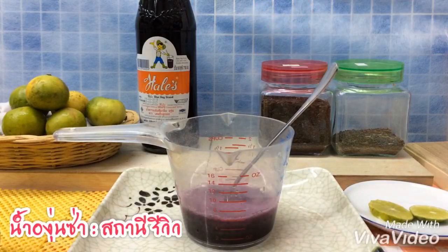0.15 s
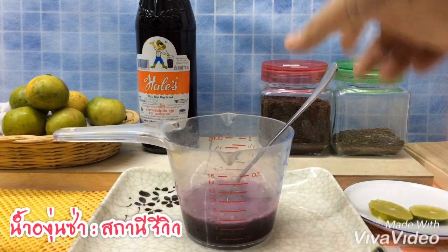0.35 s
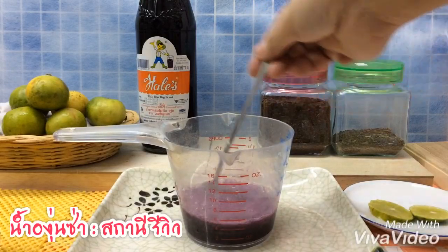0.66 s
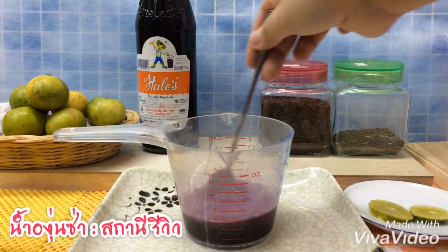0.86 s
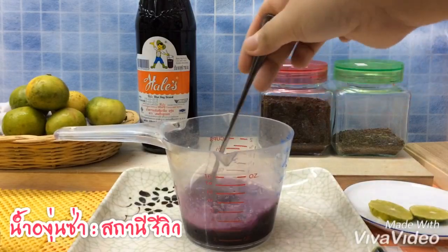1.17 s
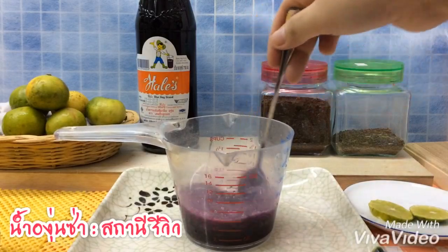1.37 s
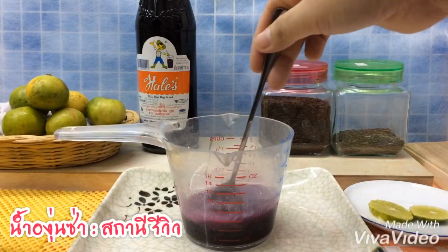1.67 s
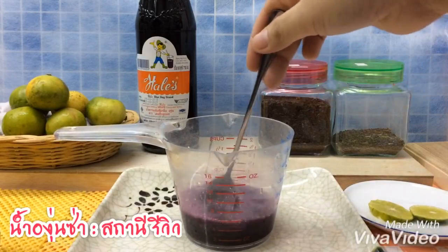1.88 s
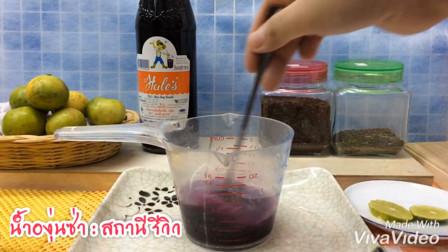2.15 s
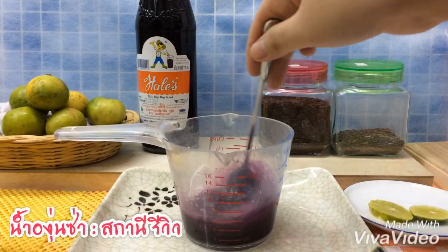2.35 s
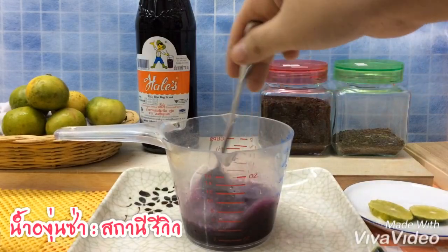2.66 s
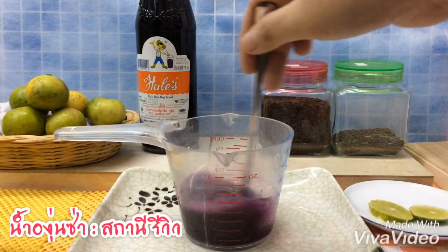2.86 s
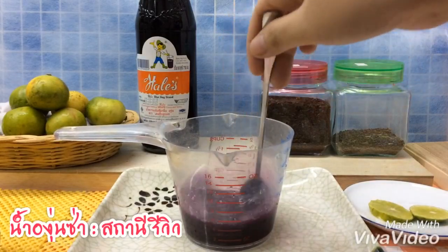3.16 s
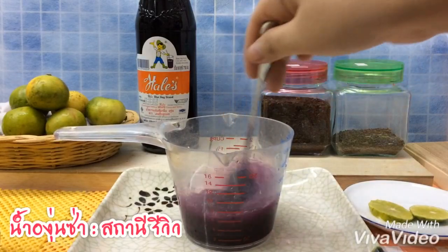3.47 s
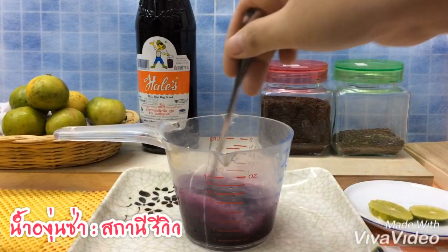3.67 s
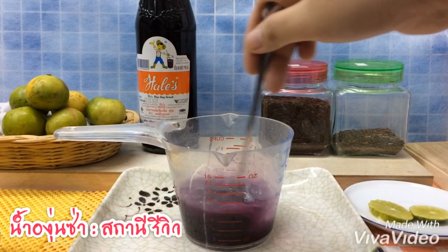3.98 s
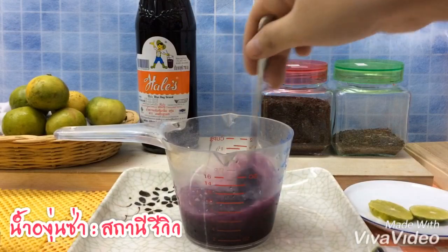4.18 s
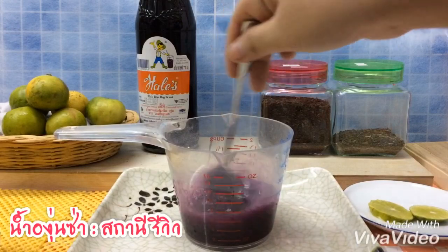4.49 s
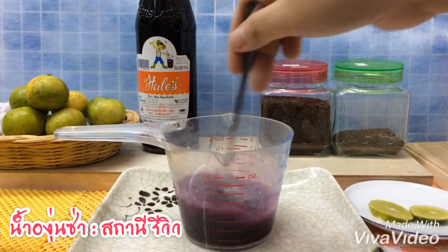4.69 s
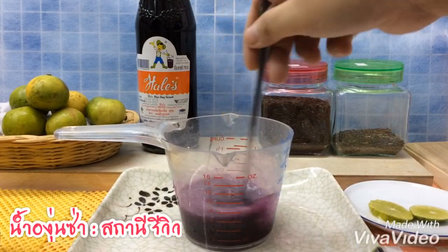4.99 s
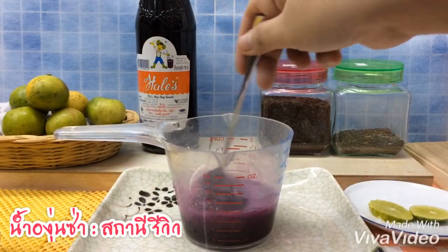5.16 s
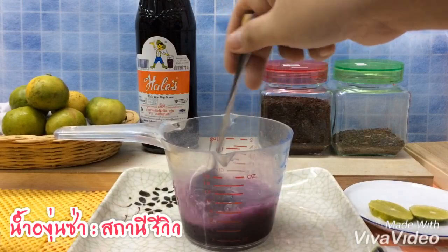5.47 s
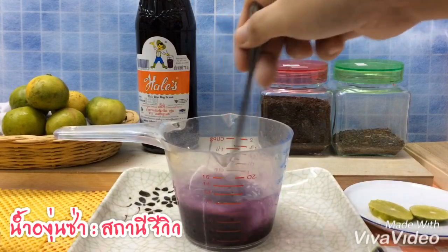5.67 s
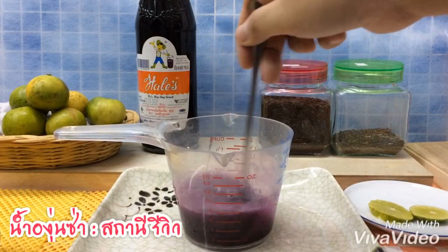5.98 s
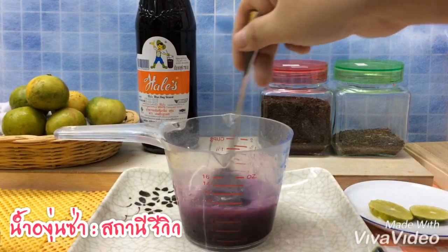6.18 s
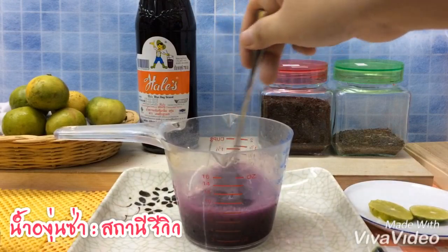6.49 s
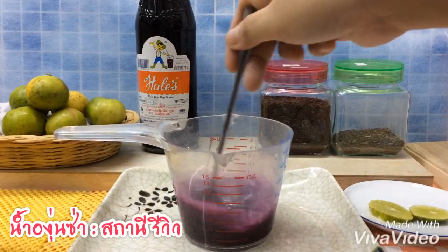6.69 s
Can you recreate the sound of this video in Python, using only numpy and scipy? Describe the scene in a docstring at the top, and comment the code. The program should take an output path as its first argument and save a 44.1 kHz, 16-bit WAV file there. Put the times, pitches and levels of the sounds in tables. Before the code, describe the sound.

For the first 0.7 seconds there is only soft hiss and deep, faint room rumble. From about 0.75 to 0.95 a long steel spoon is picked up, giving a tight cluster of bright, ringing clinks, the first lower, the next higher. A crisp hollow knock on the thin plastic jug comes at 1.1. Gentle stirring begins, with short scrapes, wet slosh and light fizz, and quieter moments near 1.8. Low gulps bubble at 1.5 and 2.55. From 2.2 the sweeps strengthen, several each second, with gurgles and uneven dull knocks, clearer at 3.7, 4.05, 4.8 and strongest at 5.4. Stirring continues steadily, with another firm knock at 6.77, until the end near 6.85. A very faint, wavering low drone swells after 6 seconds. The sound is close and fairly dry, with a short kitchen reflection.

```python
"""Spoon stirring a jug in a kitchen

Close microphone in a small kitchen: a long steel spoon is picked up, clinks, then stirs a syrupy drink
in a thin plastic jug on a tray. Clinks and knocks are decaying modes with a noise burst at the contact;
scrape, slosh and fizz are coloured random grains with bubbles, following each sweep of the bowl.
The room adds a short diffuse tail. Low rumble and soft hiss lie under it all; a faint drone comes late."""
import sys
import numpy as np
from scipy import signal
from scipy.fft import rfft, irfft, next_fast_len
from scipy.io import wavfile
from scipy.ndimage import uniform_filter1d, map_coordinates

SR = 44100
rng = np.random.default_rng(int(sys.argv[2]) if len(sys.argv) > 2 else 0)


def inscribe(sig):
    """Save sig as 16-bit PCM at rate SR to the path in sys.argv[1].

    A 1-D sig is mono; a 2-D sig holds one channel per row.
    Samples are clipped to [-1, 1] before scaling.
    """
    pcm = np.round(np.clip(np.atleast_2d(sig).T, -1, 1) * 32767)
    wavfile.write(sys.argv[1], SR, pcm.astype(np.int16))


N = 301644

# Levels in the tables are relative: each layer trims them further.
# Steady bed, hiss spectrum: f/Hz, level/dB
HISS_SPECTRUM = [(100, 3.5), (200, 5.5), (300, -2.5), (500, -3), (1100, -9.5), (2200, -12), (3700, -12),
                 (5500, -9), (7200, -6), (10000, -12.5), (16000, -18.5)]
# Steady bed, deep room rumble: f/Hz, level/dB
RUMBLE_SPECTRUM = [(8, -7), (18, -13), (27, 1), (36, -9.5), (50, -13), (60, -20), (85, -32), (125, -28.5),
                   (200, -35.5), (400, -58)]
# Decay of the kitchen's tail: f/Hz, t60/s
KITCHEN_DECAY = [(150, 0.19), (1000, 0.15), (3000, 0.18), (8000, 0.093), (16000, 0.074)]
# Bowl sweeping along the wall: t/s at its fastest, length/s, level/dB, froth over that level/dB
BOWL_SWEEPS = [(0.704, 0.12, -63.5, -9), (0.933, 0.35, -45, -22), (1.109, .2, -44.5, -3.5),
               (1.257, .13, -44.5, -2.5), (1.443, 0.059, -44, -6), (1.544, 0.13, -45.5, -8),
               (1.721, 0.047, -53, -16), (1.976, .2, -47.5, -6), (2.146, 0.13, -53.5, 0),
               (2.255, 0.086, -41.5, -10.5), (2.347, 0.094, -45, -4.5), (2.474, 0.095, -40.5, -10.5),
               (2.555, 0.12, -38, -17), (2.731, 0.072, -46, -6), (2.859, .1, -44.5, -6),
               (3.048, 0.17, -40.5, -10.5), (3.2, 0.032, -46.5, -11), (3.312, 0.14, -42, -13.5),
               (3.426, 0.15, -39.5, -9), (3.645, 0.25, -49, -3), (3.784, 0.11, -36.5, -8),
               (3.928, .06, -40, -17), (4.154, 0.12, -36.5, -7), (4.39, 0.15, -42.5, -21),
               (4.514, 0.095, -39.5, -10.5), (4.664, 0.069, -42, -20), (4.85, 0.11, -38, -12.5),
               (4.971, 0.054, -45, -12), (5.208, 0.14, -37.5, -11.5), (5.395, 0.077, -47.5, -5),
               (5.553, 0.15, -42.5, -19), (5.831, 0.12, -40, -16), (6.178, 0.16, -37.5, -17),
               (6.516, 0.18, -41, -16), (6.73, 0.079, -41.5, -5)]
# Strength of the drink's steady swirl: t/s, level/dB
SWIRL_LEVEL = [(1.35, -56), (1.88, -66.5), (2.08, -54.5), (3.32, -49.5), (3.75, -50), (4.38, -46.5),
               (5.08, -47.5), (5.34, -44.5), (5.92, -46.5), (6.84, -46.5)]
# Rubbed wall: f/Hz, level/dB
SCRAPE_SPECTRUM = [(200, -15.5), (600, -10.5), (870, 2.5), (980, 9.5), (1100, -10), (1290, -1.5),
                   (1460, 1.5), (1800, -23.5), (2500, -20.5), (4000, -29.5)]
# Churned liquid: f/Hz, level/dB
SLOSH_SPECTRUM = [(90, -24), (130, 8), (180, -24.5), (300, -6), (415, 4), (520, -4), (680, -10.5),
                  (1200, -36)]
# Bursting froth: f/Hz, level/dB
FIZZ_SPECTRUM = [(1000, -36), (2300, 0), (3500, 0.5), (5000, -1), (7000, 2), (10000, -9.5), (16000, -60)]
# Handle clinks at the pick-up: t/s, contact level/dB, low ring level/dB, high ring level/dB
HANDLE_CLINKS = [(0.7668, -18.5, -25.5, -45), (0.8193, -15, -43, -31), (0.8852, -21, -50, -28),
                 (0.9154, -24.5, -42, -58), (0.9288, -30, -44, -46), (0.9541, -26, -44, -54)]
# Bending modes of the steel spoon: f/Hz, level/dB, t60/s
SPOON_MODES = [(2110, -18, 0.44), (2270, -20, 0.3), (2882, 3.5, 0.21), (3720, -24, .3), (4300, -24, .35),
               (4697, -14, 0.3), (5380, -12, .25), (6300, -4.5, 0.18), (6287, -5, 0.17), (7192, -12, 0.18),
               (11670, -29, 0.29), (13610, -21, 0.21), (14180, -20, .18), (14900, -27, 0.23)]
# Rattling steel at the contact: f/Hz, level/dB
CHINK_SPECTRUM = [(250, -14), (420, -5), (650, -9), (1000, 1.5), (2200, 5), (4000, 2.5), (6000, 3),
                  (7800, -2.5), (10000, -17), (16000, -23)]
# Clear knocks on the jug: t/s, tick level/dB, main wall mode level/dB, upper wall modes level/dB
JUG_KNOCKS = [(1.002, -29, -30, -28.5), (1.0831, -8.5, -23, -15.5), (1.9642, -48, -35.5, -61),
              (1.9856, -44, -31.5, -51), (2.5295, -31, -25.5, -28.5), (2.5702, -35, -36.5, -32),
              (2.9452, -37.5, -37, -39), (3.0288, -24, -30.5, -27), (3.068, -43, -34, -52),
              (3.3578, -22.5, -34, -38), (3.3654, -28.5, -32, -27.5), (3.708, -18, -24, -17),
              (3.7976, -47, -31, -35), (3.9109, -50, -34, -52), (4.0566, -25.5, -23.5, -23),
              (4.2778, -27.5, -52, -27), (4.288, -26.5, -37.5, -44), (4.4925, -32, -34, -32),
              (4.5267, -33, -31.5, -49), (4.5641, -44, -31.5, -49), (4.616, -26, -28.5, -26.5),
              (4.7791, -19, -16.5, -17.5), (5.1073, -33, -26.5, -26.5), (5.1837, -34.5, -30.5, -35),
              (5.4219, -16, -12.5, -15), (5.719, -24.5, -26, -29), (5.9553, -26.5, -31, -32),
              (6.0424, -29, -26.5, -31), (6.2136, -47, -34, -56), (6.3713, -22.5, -30, -27),
              (6.769, -19.5, -19, -20)]
# Modes of the part-filled jug: f/Hz, level/dB, t60/s
JUG_MODES = [(126.7, -17, 0.26), (247, -44, 0.049), (409, -23.5, 0.13), (477.7, -12, 0.066),
             (876, -9, 0.025), (973, 4.5, 0.022), (1151, -7, 0.037), (1296, -1, 0.027), (1448, -8, 0.072),
             (1581, -7, 0.036), (1732, -12, 0.055), (1850, -21, 0.028), (2008, -14.5, .04),
             (2074, -17, 0.019), (2327, -16, 0.05), (2540, -15, 0.084), (2800, -50, 0.029),
             (3500, -28, 0.026), (3855, -17.5, 0.022), (5160, -24, .045)]
# Hard contact of bowl and wall: f/Hz, level/dB
TICK_SPECTRUM = [(100, -30), (300, -22), (500, -7), (900, 2.5), (2200, -1.5), (3300, -10.5), (5000, -11.5),
                 (7500, -11.5), (10000, -21.5), (16000, -31)]
# Air pockets gulping behind the bowl: t/s, level/dB, f/Hz
AIR_GULPS = [(1.523, -32.5, 290), (2.548, -29, 260), (2.581, -28, 268)]
# Faint far-off drone, its swell: t/s, level/dB
DRONE_LEVEL = [(5.7, -72.5), (6.3, -59.5), (6.65, -54.5), (6.84, -63)]
# Tones of the drone: f/Hz, level/dB
DRONE_PITCHES = [(160, 3), (194, -0.5)]

# a sweep: share of its length spent speeding up, dB below its peak at its start and end
RISE_SHARE, EDGE_DB = 0.47, 12.5
# soft bumps under the liquid: rate, level over the swirl, scatter either way
BUMPS_PER_S, BUMP_DB, BUMP_SPREAD_DB = 8, 6.5, 5
# the jug's low modes: level under a full-scale knock, dB per dB of the upper wall modes
BODY_DB, BODY_GROWS = -30.5, 0.4
TOP_HZ = 16000  # upper band limit


def amp(db):
    """Decibels to gain."""
    return 10 ** (np.asarray(db) / 20)


def unit(x):
    """Scale to rms 1."""
    return x / np.sqrt(np.mean(x ** 2) + 1e-20)


def along(points, hz):
    """Read (f/Hz, value) points on a log frequency axis."""
    f, v = np.transpose(points)
    return np.interp(np.log(hz + 1), np.log(f + 1), v)


def colour(x, spectrum):
    """Filter x by a spectrum, at rms 1."""
    m = next_fast_len(len(x) + 8192)
    gain = amp(along(spectrum, np.fft.rfftfreq(m, 1 / SR)))
    return unit(irfft(rfft(x, m) * gain, m)[:len(x)])


def noise(spectrum, size):
    """Coloured noise of rms 1."""
    return colour(rng.standard_normal(size), spectrum)


def add(track, s, sound):
    """Mix a sound into the track at time s."""
    i = max(0, round(s * SR))
    part = sound[:max(0, len(track) - i)]
    track[i:i + len(part)] += part


def in_kitchen(x, wet_db, gap=.004):
    """A sound plus, gap seconds later, a diffuse tail from the tiles and counter."""
    hz, t, z = signal.stft(rng.standard_normal(SR // 3), SR, nperseg=256)
    decay = amp(-60 * t / along(KITCHEN_DECAY, hz)[:, None])
    tail = signal.istft(z * decay, SR, nperseg=256)[1]
    tail = np.pad(tail / np.linalg.norm(tail), (int(gap * SR), 0))
    return x + amp(wet_db) * signal.fftconvolve(x, tail)[:len(x)]


def background(hiss_db=-56, rumble_db=-43):
    """Steady hiss over a deep room rumble, both coloured noise."""
    hiss = amp(hiss_db) * noise(HISS_SPECTRUM, size=N)
    rumble = amp(rumble_db) * noise(RUMBLE_SPECTRUM, size=N)
    return hiss + rumble


def effort():
    """Amplitude of the steady swirl, of the bowl's sweeps and of the froth that they raise."""
    t = np.arange(N) / SR
    steady = amp(np.interp(t, *np.transpose(SWIRL_LEVEL), left=-120))
    sweeps, froth = np.zeros(N), np.zeros(N)
    for s, length, db, froth_db in BOWL_SWEEPS:
        age = np.arange(-int(length * SR), int(2 * length * SR)) / SR
        away = np.maximum(-age / RISE_SHARE, age / (1 - RISE_SHARE)) / length
        swell = amp(db - EDGE_DB * away ** 1.72)
        add(sweeps, s - length, swell)
        add(froth, s - length, amp(froth_db) * swell)
    return steady, sweeps, froth


def grains(per_s, spread_db):
    """Random tiny impulses of uneven size, at rms 1."""
    scatter_db = spread_db * np.clip(rng.standard_normal(N), -2, 2)
    sizes = amp(scatter_db) * rng.choice([-1, 1], N)
    return unit(sizes * (rng.random(N) < per_s / SR))


def swirl(x, depth_db):
    """The moving hollow in the liquid lifts and damps narrow bands for moments."""
    z = signal.stft(x, nperseg=1024)[2]
    field = uniform_filter1d(rng.standard_normal(z.shape), size=3, axis=0)
    field = uniform_filter1d(field, size=4, axis=1)
    return unit(signal.istft(z * amp(depth_db * unit(field)), nperseg=1024)[1][:N])


def bubble(hz, cycles):
    """An air pocket swells over a few cycles and rings out, rising in pitch; cycles set its t60."""
    t = np.arange(SR // 10) / SR
    age = t * hz / cycles
    swell = 1 - np.exp(-t * hz / 2.2)
    return swell * amp(-60 * age) * np.sin(2 * np.pi * hz * t * (1 + 0.094 * np.minimum(age, 1)))


def bubbles(per_s, centre_hz, cycles, spread_db):
    """A random stream of bubbles, spread over an octave, at rms 1."""
    out = np.zeros(N)
    for when, size, strength in rng.random((int(per_s * N / SR), 3)):
        sound = bubble(centre_hz * 2 ** (size - .5), cycles)
        add(out, when * N / SR, amp(spread_db * strength) * sound)
    return unit(out)


def scraping(level, scrape_db=-3, gurgle_db=-10):
    """The bowl rubs along the wall in tiny slips, with mid-pitched bubbles behind it."""
    slips = swirl(colour(grains(per_s=530, spread_db=3), SCRAPE_SPECTRUM), depth_db=5.0)
    gurgles = bubbles(per_s=90, centre_hz=1194, cycles=42, spread_db=14)
    return level * (amp(scrape_db) * slips + amp(gurgle_db) * gurgles)


def sloshing(level, slosh_db=-10.0, glug_db=-16.5):
    """Dragged liquid churns as low grains, with low bubbles in it."""
    churn = swirl(colour(grains(per_s=600, spread_db=2.5), SLOSH_SPECTRUM), depth_db=3.0)
    glugs = bubbles(per_s=60, centre_hz=496.5, cycles=25, spread_db=19)
    return level * (amp(slosh_db) * churn + amp(glug_db) * glugs)


def fizzing(level, fizz_db=-3, trickle_db=-4):
    """Froth bursts as dense bright grains, with a trickle of small bubbles."""
    froth = swirl(colour(grains(per_s=7000, spread_db=0.5), FIZZ_SPECTRUM), depth_db=3.0)
    trickle = bubbles(per_s=200, centre_hz=2092, cycles=70, spread_db=10.5)
    return level * (amp(fizz_db) * froth + amp(trickle_db) * trickle)


def stirring(rub_db=-2, lap_db=-2, foam_db=-8):
    """Sweeps drive scrape, slosh and fizz; the swirl carries them on between sweeps."""
    steady, sweeps, raised = effort()
    scrape = scraping(np.hypot(sweeps, amp(rub_db) * steady))
    slosh = sloshing(np.hypot(sweeps, amp(lap_db) * steady))
    fizz = fizzing(np.hypot(raised, amp(foam_db) * steady))
    return in_kitchen(scrape + slosh + fizz, wet_db=-7.0)


def clinks(ring_db=1, high_db=-1, shimmer_db=-8, chink_db=-8, chink_t60=0.05, snap_db=-8):
    """The steel handle rattles; each point of contact favours other bending modes."""
    out, t = np.zeros(N), np.arange(SR // 2) / SR
    hz, mode_db, t60 = np.transpose(SPOON_MODES)[:, :, None]
    for s, peak, low, high in HANDLE_CLINKS:
        rest, low_ring, high_ring = peak + shimmer_db, low + ring_db, high + high_db
        force = along([(2300, rest), (2800, low_ring), (4700, low_ring),
                       (5400, high_ring), (6400, high_ring), (7100, rest)], hz)
        # loose contact with the rim blurs each line: a random walk of phase
        steps = rng.standard_normal((len(hz), len(t)))
        blur = np.cumsum(steps, axis=1) * np.sqrt(hz) * 4e-5
        phase = hz * t + blur + rng.random(hz.shape)
        # the highest modes change with every touch
        scatter = np.where(hz > 7000, rng.normal(0, 1.3, hz.shape), 0)
        modes = amp(force + scatter + mode_db - 60 * t / t60) * np.sin(2 * np.pi * phase)
        contact = amp(chink_db - 60 * t / chink_t60) + amp(snap_db - 60 * t / 0.0029)
        chink = amp(peak) * contact * noise(CHINK_SPECTRUM, size=len(t))
        add(out, s, modes.sum(axis=0) + in_kitchen(chink, wet_db=-1.5))
    return out


def bumps(tick_db=-6, upper_db=-8):
    """The swirl nudges the bowl against the wall at uneven intervals: rows like those of the knocks."""
    count = int(BUMPS_PER_S * N / SR)
    chance = rng.random((count, 4))
    times = (np.arange(count) + chance[:, 0]) / BUMPS_PER_S
    level = np.interp(times, *np.transpose(SWIRL_LEVEL), left=-120) + BUMP_DB
    scatter = BUMP_SPREAD_DB * (2 * chance[:, 1:] - 1)
    levels = level[:, None] + [tick_db, 0, upper_db] + scatter
    return np.column_stack([times, levels]).tolist()


def knocks(ring_db=0, upper_db=0, low_db=16, tick_db=-7, bright_db=-2, swell_cycles=3.1,
           tick_t60=0.013, snap_db=-5, hard_db=-36):
    """Each knock is a tick and a short hollow ring; harder contacts wake the higher wall modes."""
    out, t = np.zeros(N), np.arange(SR // 3) / SR
    hz, mode_db, t60 = np.transpose(JUG_MODES)[:, :, None]
    # the bowl drives the wall for a few cycles, 7 ms at most, before the ring dies
    free = np.maximum(t - np.minimum(6.5 / hz, .007), 0)
    snap = amp(-60 * t / .003)
    for s, tick, main, upper in JUG_KNOCKS + bumps():
        low = min(upper, BODY_DB + BODY_GROWS * upper)
        push, body, wall, top = main + ring_db, low + low_db, upper + upper_db, tick + bright_db
        force = along([(150, push), (240, body), (520, body), (850, push),
                       (1000, push), (1250, wall), (1750, wall), (2300, top)], hz)
        # the swirling liquid loads the wall unevenly
        pitch = hz * (1 + 0.011 * rng.standard_normal(hz.shape))
        rise = 1 - np.exp(-t * pitch / swell_cycles)  # low modes take longer to build up
        modes = amp(force + mode_db + rng.normal(0, 1, hz.shape) - 60 * free / t60) * rise
        ring = np.sum(modes * np.sin(2 * np.pi * (pitch * t + rng.random(hz.shape))), axis=0)
        # a snap, with the wall's dense high modes dying more slowly
        contact = amp(tick_db - 60 * t / tick_t60) + amp(snap_db) * snap
        cushion_db = min(0, tick - hard_db)  # the liquid takes the click out of light bumps
        crack = amp(tick + cushion_db) * contact * noise(TICK_SPECTRUM, size=len(t))
        add(out, s, in_kitchen(ring, wet_db=-9, gap=.007) + in_kitchen(crack, wet_db=-1.5))
    return out


def gulps(level_db=5):
    """Large pockets are low and heavily damped by the syrup."""
    out = np.zeros(N)
    for s, db, hz in AIR_GULPS:
        add(out, s, amp(db + level_db) * bubble(hz, cycles=9.1))
    return in_kitchen(out, wet_db=-8)


def wobble(rate):
    """A smooth random curve, rate knots a second."""
    knots = rng.standard_normal(int(N * rate / SR) + 4)
    return map_coordinates(knots, [np.arange(N) * rate / SR])


def drone(waver=0.012):
    """Two low tones of wavering pitch swell in, perhaps an engine outside."""
    level = amp(np.interp(np.arange(N) / SR, *np.transpose(DRONE_LEVEL), left=-120))
    tones = np.zeros(N)
    for hz, db in DRONE_PITCHES:
        turns = np.cumsum(hz * (1 + waver * wobble(rate=12))) / SR
        tones += amp(db) * np.sin(2 * np.pi * turns)
    return level * tones


def scene():
    """Everything at one close microphone, as one channel."""
    return (background() + stirring() + clinks() + knocks() + gulps() + drone())[None]


def record(dry):
    """The recorder keeps nothing above its band limit."""
    m = next_fast_len(N + 8192)
    return irfft(rfft(dry, m) * (np.fft.rfftfreq(m, 1 / SR) < TOP_HZ), m)[..., :N]


dry = scene()
out = record(dry)
inscribe(out)
```